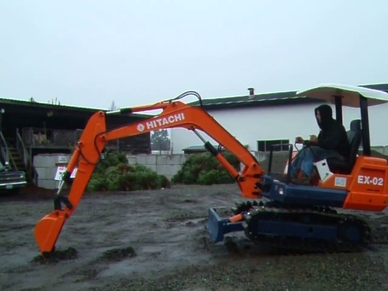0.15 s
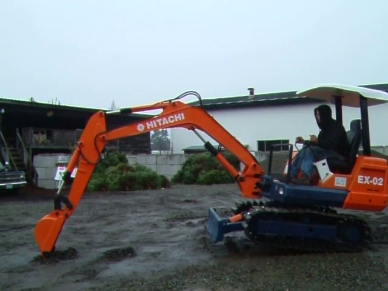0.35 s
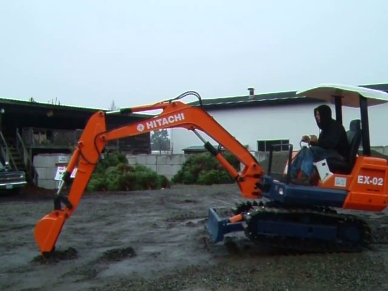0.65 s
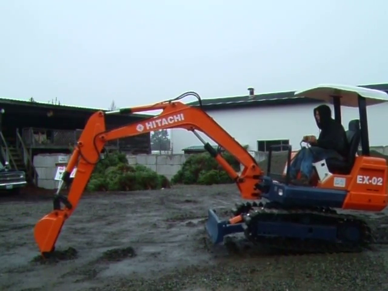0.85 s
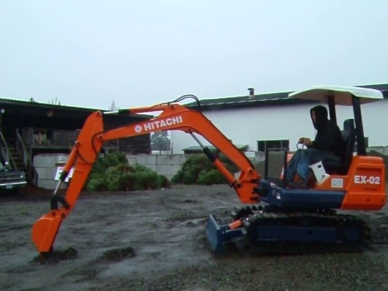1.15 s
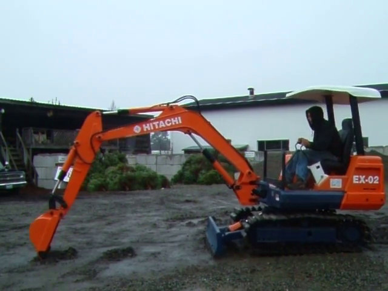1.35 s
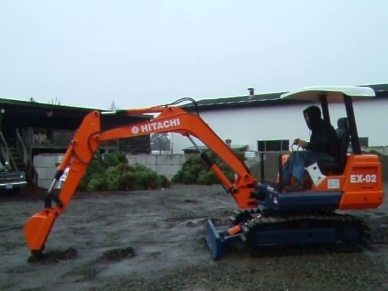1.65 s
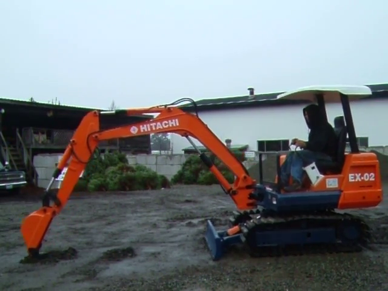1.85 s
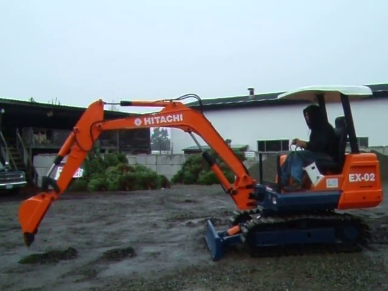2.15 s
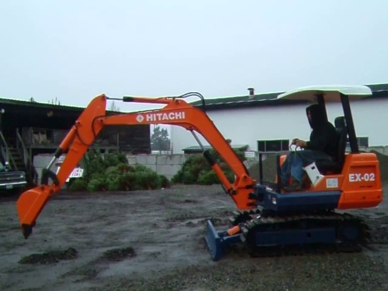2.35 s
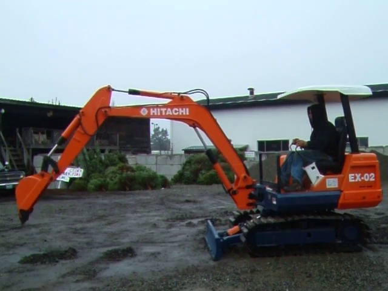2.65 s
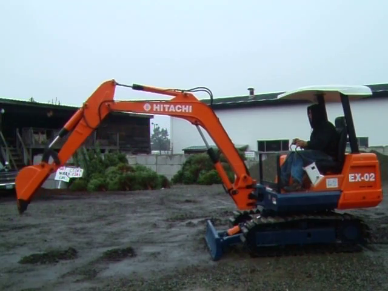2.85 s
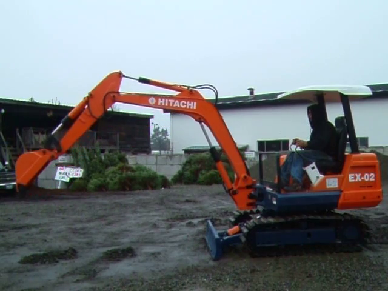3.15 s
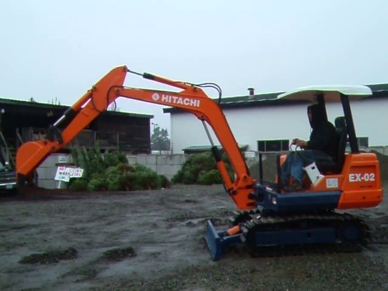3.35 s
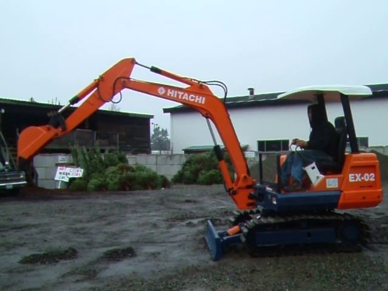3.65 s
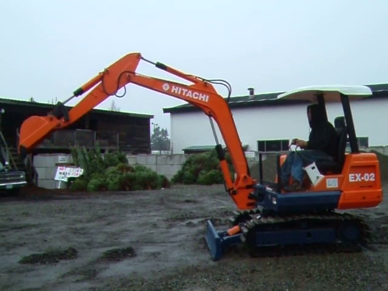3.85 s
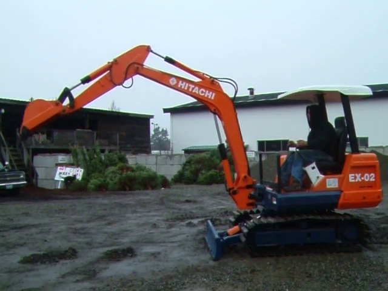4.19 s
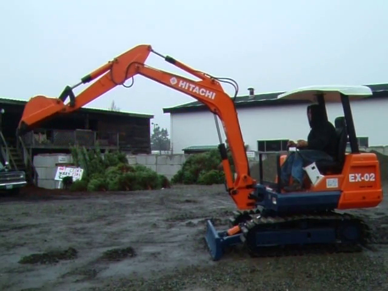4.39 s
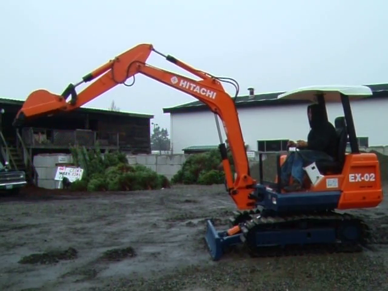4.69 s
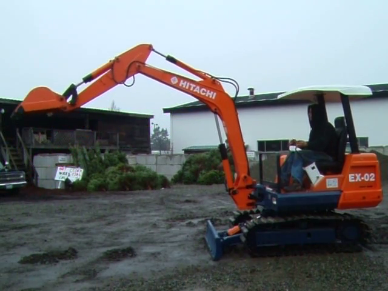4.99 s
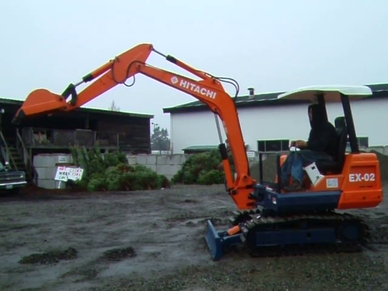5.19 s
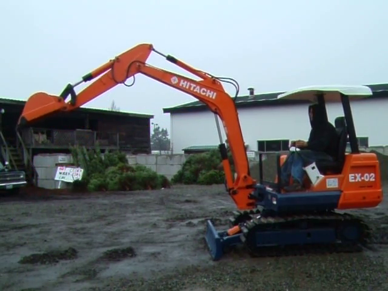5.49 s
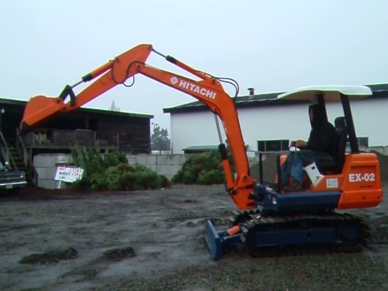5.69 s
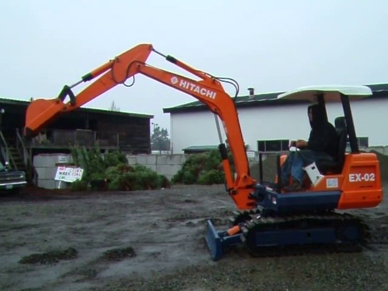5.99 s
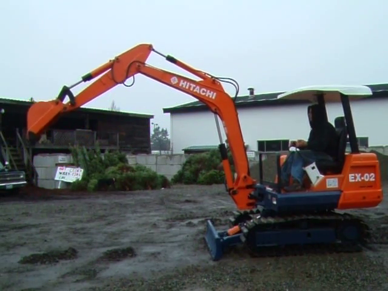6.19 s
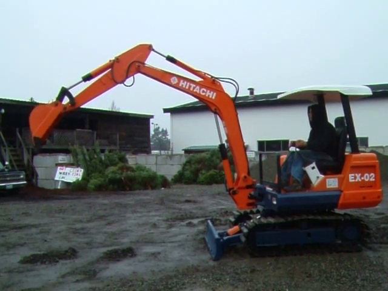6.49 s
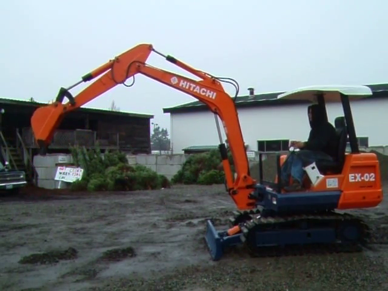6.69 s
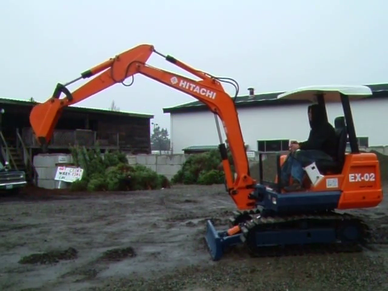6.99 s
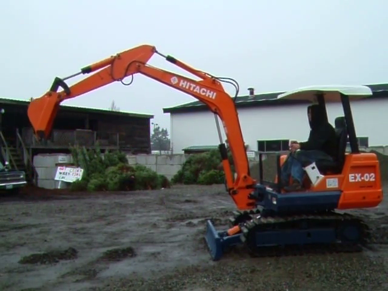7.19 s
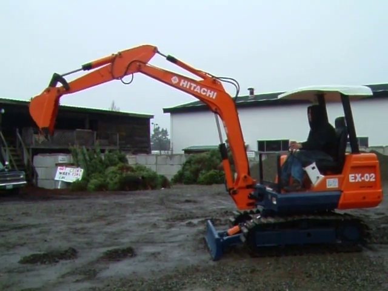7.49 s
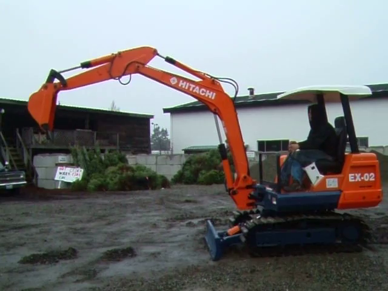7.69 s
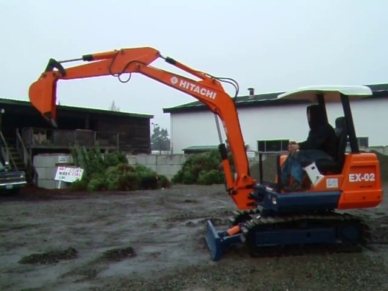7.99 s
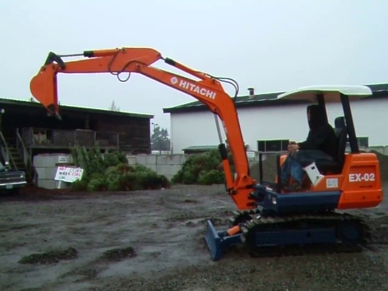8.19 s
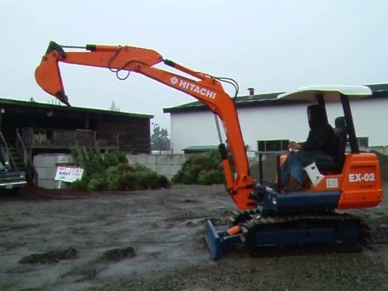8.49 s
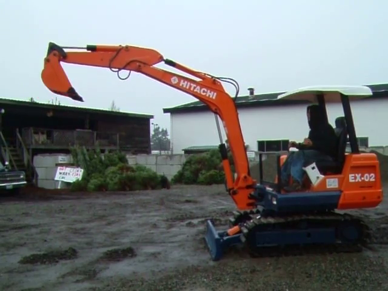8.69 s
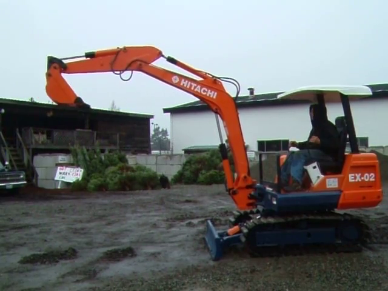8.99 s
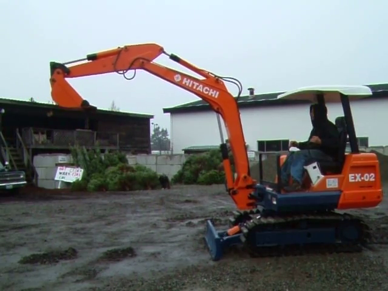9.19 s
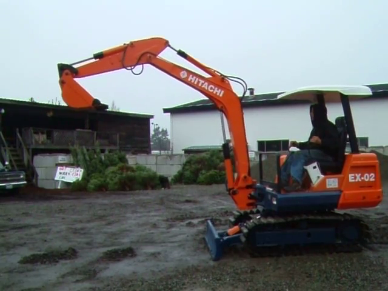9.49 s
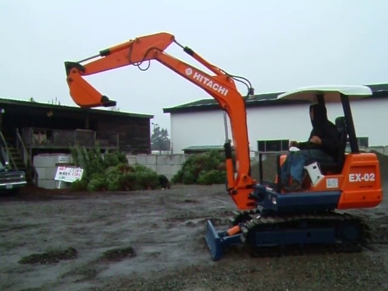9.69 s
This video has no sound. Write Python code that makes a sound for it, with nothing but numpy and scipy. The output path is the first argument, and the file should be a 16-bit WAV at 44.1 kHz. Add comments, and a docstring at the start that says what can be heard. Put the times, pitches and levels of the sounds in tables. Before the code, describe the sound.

Rattling small diesel engine drones close by, its pitch sagging and rising under hydraulic load, with bucket teeth scraping gravel and a few metallic clanks.

```python
"""Small diesel excavator in an open yard

A four-cylinder engine sags in speed under hydraulic load. Its exhaust throbs in tones locked to the firing rate;
repeating noise rattles the steel housing and valve and injector bursts knock once a cycle. Speed-locked tones fade
in and out, bucket teeth scrape gravel, the linkage clanks, and low speed brings buzz and chirps over faint air noise.
The level of engine and air dips suddenly at set moments, deepest in the firing tones and air, and creeps back."""
import sys
import numpy as np
from scipy import signal
from scipy.fft import rfft, irfft, next_fast_len
from scipy.io import wavfile

SR = 44100
rng = np.random.default_rng(int(sys.argv[2]) if len(sys.argv) > 2 else 0)


def wrap_up_sound(samples):
    """Save the sound to the file named by the first command line argument, as 16-bit audio."""
    columns = np.atleast_2d(samples).T
    # keep every value between -1 and 1, then stretch to whole-number steps
    tamed = np.clip(columns, -1, 1)
    steps = np.round(tamed * 32767).astype(np.int16)
    wavfile.write(sys.argv[1], SR, steps)


N = 434385
RUMBLE_REPEAT = 0.55  # share of the rumble's power that recurs each cycle


def exhaust(firing, hz, tone_db, octave_db, upper_db):
    """Orders of the firing rate add up to suction troughs, skewed by the muffler; the pipe lifts orders near it."""
    # upper exhaust orders: (multiple of the firing rate, level [dB])
    upper_orders = [(1.5, -4), (1.751, -13.5), (2.248, -9), (2.498, -25.5), (5.001, -6), (6, 4.5),
                    (6.25, -5), (7, 0.5), (7.999, -20)]
    # orders that follow the octave:
    # (multiple of the firing rate, level against the octave at mid speed [dB], slope away from it [dB per Hz])
    near_orders = [(3, -22, 1.08), (4, -22.5, .2)]
    mid_speed_hz, muffler_hz = 69.4, 56
    pipe_hz, pipe_half_width_hz, pipe_db = 375, 32, 10

    def order(multiple):
        muffler_phase = np.arctan(multiple * hz / muffler_hz)
        return np.cos(2 * np.pi * multiple * firing - muffler_phase)

    uneven_db = 0.5 * drift(15)  # firings differ in force
    low = from_db(tone_db + uneven_db) * order(1)
    low += from_db(octave_db + uneven_db) * order(2)
    for multiple, db, slope in near_orders:
        speed_db = slope * np.abs(hz - mid_speed_hz)
        low += from_db(octave_db + db + speed_db + 2.0 * drift(4.4)) * order(multiple)
    upper = np.zeros(N)
    for multiple, db in upper_orders:
        pipe_lift = 1 / (1 + ((multiple * hz - pipe_hz) / pipe_half_width_hz) ** 2)
        upper += from_db(db + pipe_db * pipe_lift + 2.0 * drift(5.2)) * order(multiple)
    return -np.sqrt(2) * (low + from_db(upper_db - 8.5) * upper)


def housing(cycle, hz, rumble_db, clatter_db):
    """A bed of rattle rings the panels; the contacts stand out of it as short bursts."""
    # rumble spectrum: (frequency [Hz], level [dB])
    rumble_spectrum = [(100, -16), (170, -4), (194, -13), (258, -15.5), (450, -12), (575, -12), (1200, -20),
                       (1560, -29), (2640, -120)]
    # clatter spectrum: (frequency [Hz], level [dB])
    clatter_spectrum = [(470, -35.5), (800, -6.5), (999, -6.5), (1080, -6.5), (1620, -5), (2210, -6),
                        (3000, -11.5), (3630, -10.5), (6990, -18.5), (7810, -22), (8900, -4.5),
                        (11600, -91.5), (19600, -120)]
    # housing panels that ring: (frequency [Hz], width [Hz], boost [dB])
    panels = [(410, 11, -5), (660, 4, 7), (740, 20, 3.5), (991, 7.6, 7), (1177, 20, 5), (1606, 17, 6),
              (1838, 97, 4.5), (2175, 60, 2.5), (2630, 94, 4.5), (2734, 100, 3), (3520, 170, 3),
              (3830, 150, 2)]
    # valve and injector contacts: (share of the four-stroke cycle, frequency [Hz], width [Hz], level [dB])
    contacts = [(0.029, 2170, 200, 2), (0.102, 1620, 149.6, -2.5), (.26, 1766, 205, -4.5),
                (0.272, 5100, 1430, -5), (.37, 2540, 251, -14), (0.528, 2220, 322, -2.5),
                (0.53, 3550, 404, -4), (0.529, 6330, 2640, -3), (0.591, 1686, 151, -3.5),
                (0.639, 3540, 298, -8), (0.762, 2620, 250, -3.5), (.80, 1854, 260, 1.5),
                (0.808, 2287, 254, 2), (0.813, 5900, 2030, -9.5), (0.852, 3750, 255, -7.5),
                (.95, 755, 119.4, -11.5), (0.963, 2150, 253, -4)]
    clatter_repeat, contact_repeat = 0.62, 0.75  # shares of the power that recur each cycle
    knock_db = -1.5  # all contacts, against the clatter

    rumble = colour(rattle(cycle, hz, RUMBLE_REPEAT), rumble_spectrum)
    clatter = colour(rattle(cycle, hz, clatter_repeat), clatter_spectrum)
    body = from_db(rumble_db) * rumble
    body += from_db(clatter_db + 0.5 + 0.5 * drift(7)) * clatter
    body += sum((from_db(db) - 1) * resonance(body, mode_hz, width_hz) for mode_hz, width_hz, db in panels)

    metal = rattle(cycle, hz, contact_repeat)
    knocks = np.zeros(N)
    for at, mode_hz, width_hz, db in contacts:
        burst = metal * once_a_cycle(cycle, at, spread_db=2.5)
        knocks += from_db(db) * struck(burst, mode_hz, width_hz)
    return body + from_db(clatter_db + knock_db) * knocks


def speed_locked_tones(firing, clatter_db):
    """Tones locked to the firing rate: whines, and the fourth exhaust order swelling at low speed."""
    # (multiple of the firing rate, start [s], stop [s], level against the clatter [dB])
    locked_lines = [(6.6, 2.2, 6.2, -18), (9.5, 2.27, 4.4, -13.5), (10.4, 2.9, 4.8, -12.5),
                    (10.58, 7.0, 8.95, -12), (4, 9.15, 9.97, -7), (15.8, 9.5, 9.97, -11),
                    (12.3, 2.6, 4.7, -15), (12.04, 7.1, 9.5, -12.5), (13.02, 5.3, 7.7, -14),
                    (13.56, 7.0, 8.7, -14), (21.33, .2, 1.17, -13), (21.43, 5.4, 7.0, -13),
                    (22.43, 0.14, 4.6, -13.5), (24.74, 5.4, 7.8, -13), (28.3, 4.7, 7.0, -13),
                    (29.25, 5, 7.8, -15)]
    fade_s, flutter_db = 0.083, 2.0
    t, out = np.arange(N) / SR, np.zeros(N)
    for multiple, start, stop, db in locked_lines:
        fade = np.clip(np.minimum(t - start, stop - t) / fade_s, 0, 1)
        tone = np.cos(2 * np.pi * (multiple * firing + rng.random()))
        out += fade * from_db(db + flutter_db * drift(5.3)) * tone
    return np.sqrt(2) * from_db(clatter_db + 1.4 * drift(3.4)) * out


def buzz(cycle, hz, clatter_db):
    """As the engine lugs at low speed, the shaking sets a few panels buzzing."""
    # panels that buzz: (frequency [Hz], width [Hz], level against the clatter [dB])
    buzzing_panels = [(695, 60, -6), (1184, 58, -9.5), (5600, 1600, -12.5)]
    lug_from_hz, lug_full_hz = 64.6, 63.5  # firing rates
    lug = np.clip((lug_from_hz - hz) / (lug_from_hz - lug_full_hz), 0, 1)
    shaking = lug * from_db(clatter_db) * rattle(cycle, hz, RUMBLE_REPEAT)
    return sum(from_db(db) * struck(shaking, mode_hz, width_hz) for mode_hz, width_hz, db in buzzing_panels)


def bucket():
    """Each stroke of the teeth is a burst of stone clicks: they ring the shell and hiss as grit."""
    # strokes on gravel: (time [s], level [dB], grit against the stroke [dB],
    # lowest mode against the stroke [dB], rise [s], decay [s])
    scrapes = [(1.023, -14.5, 4, -7, 0.0037, 0.026), (1.201, -1, -17, -3, 0.0048, 0.014),
               (1.289, -9.5, -1, -11, 0.016, 0.042), (1.331, -11.5, 4, -4, 0.0084, 0.02),
               (1.362, -18, -14, -8, 0.0051, 0.011), (1.404, -16.5, -1, -6, 0.0082, 0.049),
               (1.485, -10, 1, -8, 0.0069, 0.022), (1.511, -7.5, 1.5, -11, 0.0013, 0.024),
               (1.55, -19, 2, -3, .006, 0.072), (1.674, -10, 3, -6.5, 0.0097, 0.025),
               (1.768, -18.5, 9.5, 3.5, 0.033, 0.053), (1.838, -24, -3.5, 1, .01, 0.037),
               (8.545, -9, -22, 0, .001, 0.0086)]
    # bucket shell modes, lowest first: (frequency [Hz], width [Hz], level [dB])
    shell_modes = [(471, 45, 8), (705, 32, 6.5), (830, 42, -5), (940, 20, -1), (1083, 21, -5),
                   (1315, 41, -3), (1620, 55, -11), (2360, 74, -5), (3540, 94, -13), (5200, 81, -10)]
    # grit spectrum: (frequency [Hz], level [dB])
    grit_spectrum = [(530, -17), (900, -25), (1100, -11), (2090, -14), (2370, -8.5), (4300, -12),
                     (6490, -21), (8900, -16), (11600, -81), (19600, -120)]
    t = np.arange(N) / SR
    low, ringing, hiss = np.zeros((3, N))
    for s, db, grit_db, low_db, rise_s, decay_s in scrapes:
        age = np.maximum(t - s, 0)
        stroke = from_db(db) * (1 - np.exp(-age / rise_s)) * np.exp(-age / decay_s)
        ringing += stroke
        low += from_db(low_db) * stroke
        hiss += from_db(grit_db) * stroke
    stones = rng.standard_normal(N) * (rng.random(N) < 0.15)  # sparse clicks
    shell = np.zeros(N)
    for k, (hz, width_hz, db) in enumerate(shell_modes):
        drive = (ringing if k else low) * stones
        shell += (-1) ** k * from_db(db) * resonance(drive, hz, width_hz)  # neighbours in opposite phase
    return from_db(22) * shell + from_db(-10.5) * hiss * colour(stones, grit_spectrum)


def linkage():
    """A pin takes up its slack: a broad bright crack that dies fast."""
    # clanks: (time [s], level [dB], centre [Hz], width of each of two filters [Hz], decay [s])
    clanks = [(4.4762, -24, 2190, 1300, 0.012), (4.6299, -22, 2196, 1300, 0.016),
              (5.1198, -12.5, 3300, 2200, 0.014), (7.4465, -29, 2461, 1500, 0.012),
              (7.5423, -17.5, 2490, 1800, 0.015), (8.8755, -21.5, 5000, 6000, 0.011)]
    out, t, white = np.zeros(N), np.arange(N) / SR, rng.standard_normal(N)
    for s, db, hz, width_hz, decay_s in clanks:
        age = t - s
        burst = white * np.exp(-np.maximum(age, 0) / decay_s) * (age >= 0)
        crack = resonance(resonance(burst, hz, width_hz), hz, width_hz)
        out += from_db(db + 9.5) * crack
    return out


def chirps():
    """A loose part squeaks briefly in one narrow mode, part tone and part rubbing noise."""
    # chirps while the engine lugs: (time [s], level [dB])
    squeaks = [(9.198, -23), (9.262, -22), (9.325, -25), (9.386, -20), (9.441, -22), (9.508, -25),
               (9.562, -21.5), (9.585, -25), (9.635, -29), (9.691, -26), (9.816, -25), (9.832, -23)]
    mode_hz, width_hz, decay_s, roughness = 4210, 74, 0.005, 0.4
    t = np.arange(N) / SR
    rub = sum(from_db(db) * (t >= s) * np.exp(-np.maximum(t - s, 0) / decay_s) for s, db in squeaks)
    tone = resonance(rub * np.cos(2 * np.pi * mode_hz * t), mode_hz, width_hz)
    rubbing = struck(rub * rng.standard_normal(N), mode_hz, width_hz)
    return from_db(7.0) * tone + roughness * rubbing


def air(down_db):
    """Lumpy sub-bass noise from air moving at the microphone."""
    air_db = -59.5
    band = signal.butter(2, [33, 55], "band", fs=SR, output="sos")
    return from_db(air_db - down_db) * rms_one(signal.sosfilt(band, rng.standard_normal(N)))


def levels(hz, down_db):
    """Levels of firing tone, octave, upper orders, rumble and clatter from speed and dip."""
    # loudness against engine speed: (firing rate [Hz], firing tone [dB], octave [dB],
    # upper exhaust orders [dB], housing rumble [dB])
    by_speed = [(63.4, -27.2, -15, -26.5, -26.5), (65.1, -31, -9.8, -32, -27.2),
                (67.4, -23, -15, -32.5, -23.5), (68.8, -24.2, -14.8, -39, -30),
                (70.8, -21, -16.5, -31, -26.5), (73.3, -21, -18.3, -30.5, -27),
                (76.2, -16, -19.5, -30, -26.5)]
    # the octave drops out for a moment as the engine picks up speed: (time [s])
    dropouts_s = [.074, 5.235]
    dropout_db, dropout_width_s = 6.5, 0.028
    upper_share, rumble_share, clatter_share = 0.7, 0.73, 0.35  # of the dip that the firing tones take
    clatter_db = -24.5

    rate_hz, *columns = np.transpose(by_speed)
    tone_db, octave_db, upper_db, rumble_db = (np.interp(hz, rate_hz, c) for c in columns)
    t = np.arange(N) / SR
    octave_loss_db = sum(dropout_db * np.exp(-((t - s) / dropout_width_s) ** 2) for s in dropouts_s)
    return (tone_db - down_db,
            octave_db - down_db - octave_loss_db,
            upper_db - upper_share * down_db,
            rumble_db - rumble_share * down_db,
            clatter_db - clatter_share * down_db)


def dip():
    """How far the level is down, in dB: each dip adds its depth, and the sum is worked off at a steady rate."""
    # sudden dips: (time [s], added depth [dB])
    dips = [(0.0, 7), (0.777, 2.2), (0.95, 2.2), (1.218, 14), (1.522, 8.5), (3.576, 0.8), (3.78, 1),
            (4.2, 1.2), (5.21, 2.5), (5.44, 2.5), (5.85, 2), (6.19, 3.2), (6.765, 2.5), (7.07, 2.2),
            (7.257, 2), (7.514, 3.5), (8.002, 3.0), (8.56, 1.3), (8.79, 0.5), (8.889, 4.5), (9.076, 3),
            (9.31, 2.6), (9.616, 4)]
    attack_s, recovery_db_per_s = 0.006, 10
    s, depth_db = np.transpose(dips)
    steps = np.zeros(N)
    steps[(s * SR).astype(int)] = np.maximum(depth_db, 0)
    owed = np.cumsum(steps) - recovery_db_per_s * np.arange(N) / SR
    down = owed - np.minimum(np.minimum.accumulate(owed), 0)  # never above full level
    r = np.exp(-1 / (attack_s * SR))
    return signal.lfilter([1 - r], [1, -r], down, zi=[r * down[0]])[0]


def rattle(cycle, hz, share):
    """Noise of which a share recurs at the same crank angle; the pattern reshapes with speed and a slow wander."""
    size = 2400  # noise values per cycle
    position = (cycle % 1 * size).astype(int)
    first, second = rng.standard_normal((2, size))[:, position]
    blend = 0.4 * hz + 0.3 * drift(0.3)
    recurring = np.cos(blend) * first + np.sin(blend) * second
    return np.sqrt(share) * recurring + np.sqrt(1 - share) * rng.standard_normal(N)


def once_a_cycle(cycle, share, spread_db):
    """A short decaying envelope struck at one crank angle in every full cycle, uneven in force."""
    decay_s = 0.0042
    count = int(cycle[-1])
    clicks = np.zeros(N + 1)
    hits = np.searchsorted(cycle, np.arange(count) + share)
    clicks[hits] = from_db(spread_db * rng.standard_normal(count))
    return signal.lfilter([1], [1, -np.exp(-1 / (decay_s * SR))], clicks[:N] + 1e-18)


def struck(burst, hz, width_hz):
    """A noise burst rings a mode; unit noise gives about unit rms."""
    return resonance(burst, hz, width_hz) / np.sqrt(np.pi * width_hz / SR)


def resonance(x, hz, width_hz):
    """Two-pole band-pass, gain about 1 on top."""
    r = np.exp(-np.pi * width_hz / SR)
    feedback = [1, -2 * r * np.cos(2 * np.pi * hz / SR), r * r]
    return signal.lfilter([(1 - r * r) / 2, 0, (r * r - 1) / 2], feedback, x + 1e-18)


def colour(x, spectrum):
    """Impose a spectrum, falling steeply below its first point; rms 1."""
    hz, db = np.transpose(spectrum)
    size = next_fast_len(N)
    log_hz = np.log(np.arange(size // 2 + 1) * SR / size + 1)
    shape_db = np.interp(log_hz, np.log(hz), db)
    shape_db -= 40 * np.maximum(np.log(hz[0]) - log_hz, 0)
    return rms_one(irfft(rfft(x, size) * from_db(shape_db), size)[:N])


def drift(rate_hz):
    """Slow random wander drawn at every 40th sample, spread 1."""
    step, settle = 40, 2000
    r = np.exp(-2 * np.pi * rate_hz * step / SR)
    white = rng.standard_normal(N // step + 2 + settle)
    slow = signal.lfilter([1], [1, -2 * r, r * r], white)[settle:]
    return np.interp(np.arange(N) / step, np.arange(len(slow)), rms_one(slow))


def from_db(db):
    """Decibels to gain."""
    return 10 ** (np.asarray(db) / 20)


def rms_one(x):
    """Scale to unit rms."""
    return x / np.sqrt(np.mean(x ** 2) + 1e-20)


def scene():
    """All sources: engine layers follow one speed; scrapes, clanks and chirps come at set times."""
    # engine speed: (time [s], firing rate [Hz])
    speed = [(0.0, 72.6), (0.27, 75.7), (0.55, 76.2), (0.78, 76.2), (1.03, 72.6), (1.4, 72.6),
             (2.07, 70.65), (3.0, 70.85), (4.17, 70.8), (4.39, 72.7), (4.68, 70.5), (5.02, 68.9),
             (5.13, 70.2), (5.24, 73.5), (5.5, 75.4), (6.1, 75.7), (6.83, 75.5), (7.1, 73.2), (7.45, 72.7),
             (7.59, 74.0), (7.8, 72.8), (8.6, 72.25), (8.81, 74.1), (9.12, 65.7), (9.33, 63.0),
             (9.85, 63.15)]
    pipe_lag = 0.62  # firings between the valve and the pipe mouth
    hz = np.interp(np.arange(N) / SR, *np.transpose(speed))
    firing = np.cumsum(hz) / SR
    cycle = firing / 4  # four firings per four-stroke cycle
    down_db = dip()
    tone_db, octave_db, upper_db, rumble_db, clatter_db = levels(hz, down_db)

    engine = exhaust(firing - pipe_lag, hz, tone_db, octave_db, upper_db)
    engine += housing(cycle, hz, rumble_db, clatter_db)
    engine += speed_locked_tones(firing, clatter_db) + buzz(cycle, hz, clatter_db)
    return (engine + bucket() + linkage() + chirps() + air(down_db))[None]


def record(dry):
    """Peaks are rounded, the top is cut."""
    cutoff_hz = 9250
    rounded = 0.84 * np.tanh(dry / 0.98)
    return signal.sosfilt(signal.cheby2(12, 70, cutoff_hz, fs=SR, output="sos"), rounded)


dry = scene()
out = record(dry)
wrap_up_sound(out)
```